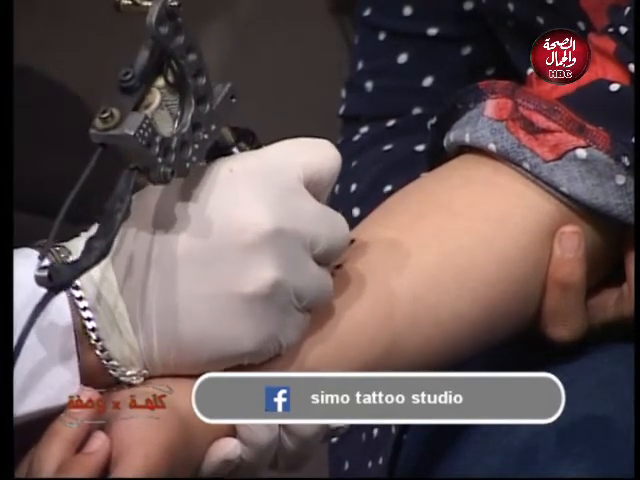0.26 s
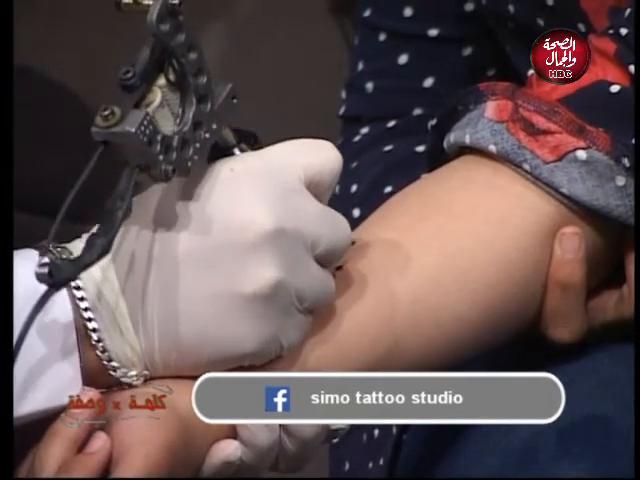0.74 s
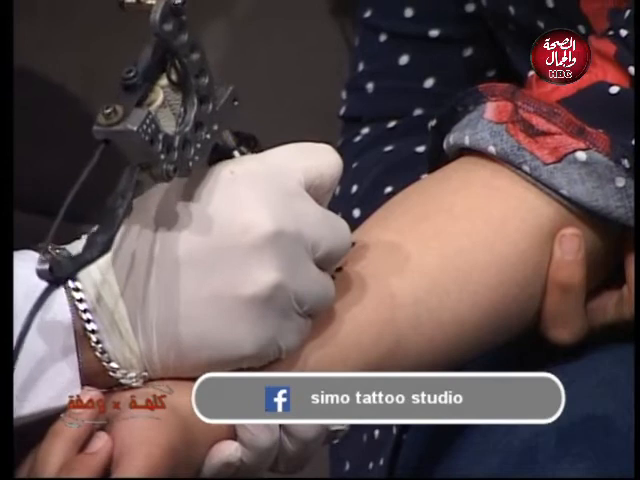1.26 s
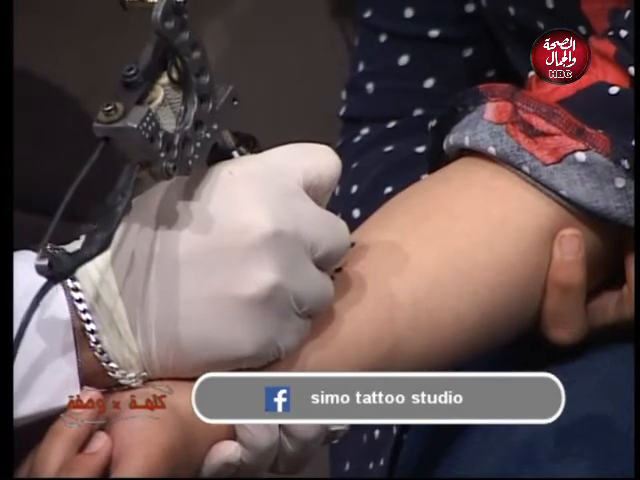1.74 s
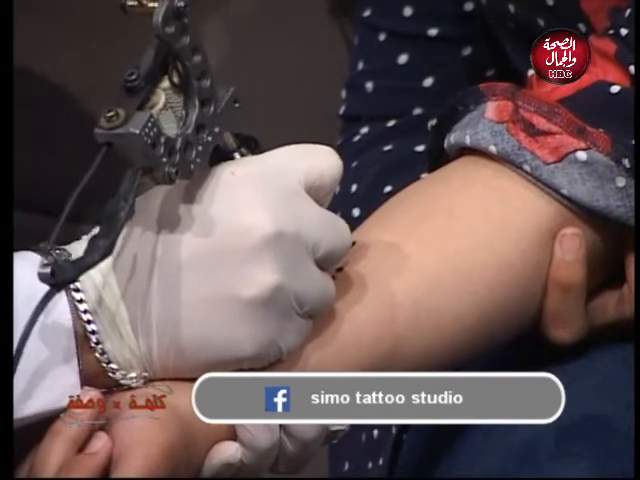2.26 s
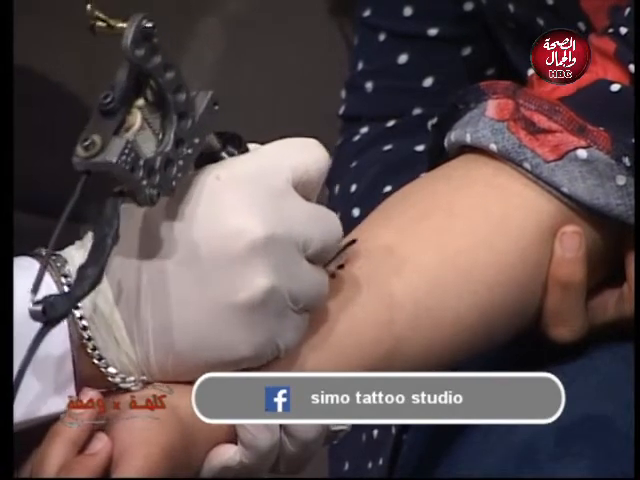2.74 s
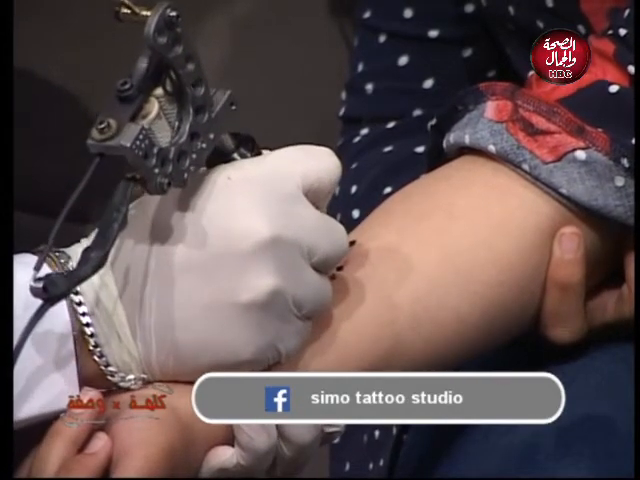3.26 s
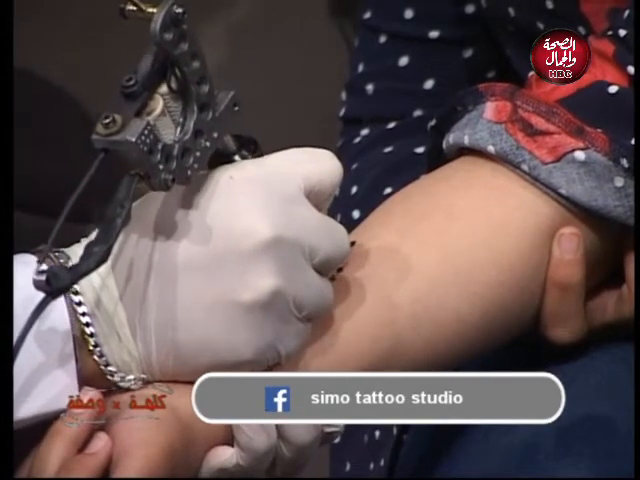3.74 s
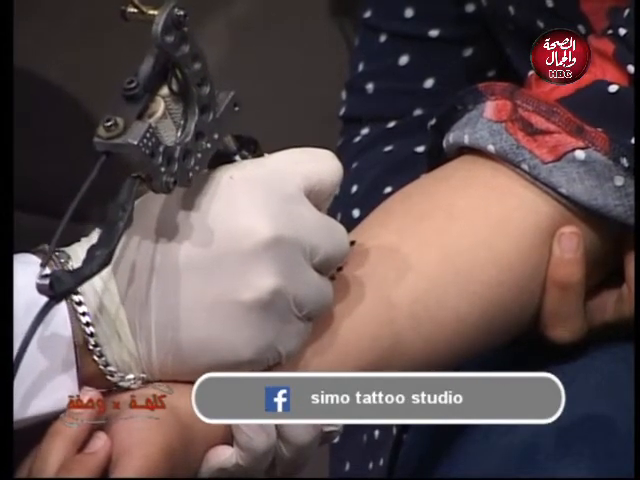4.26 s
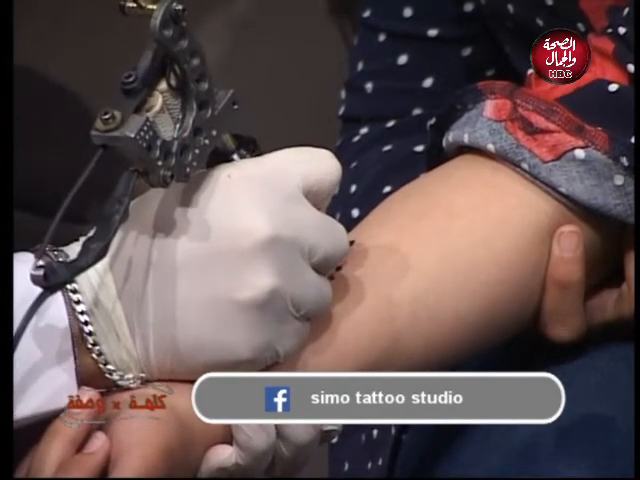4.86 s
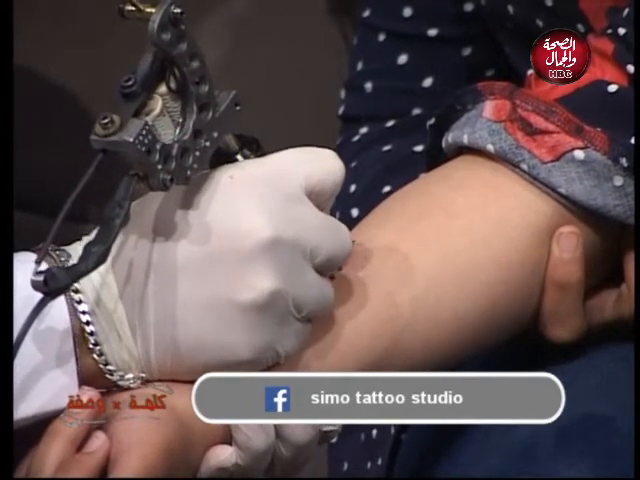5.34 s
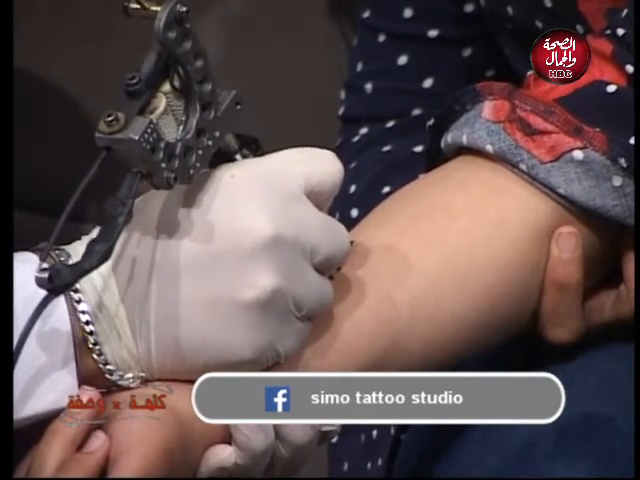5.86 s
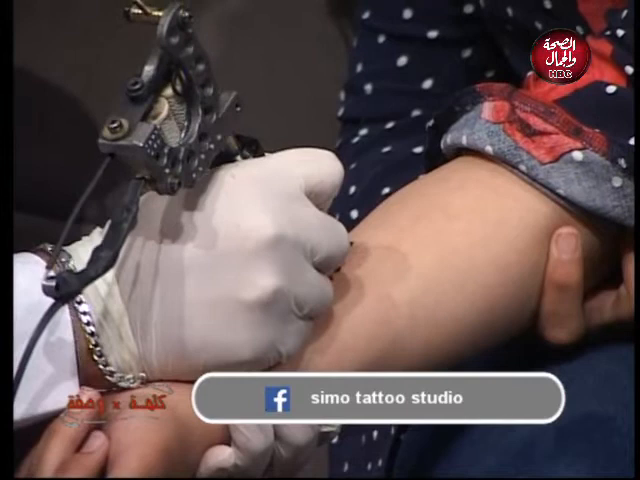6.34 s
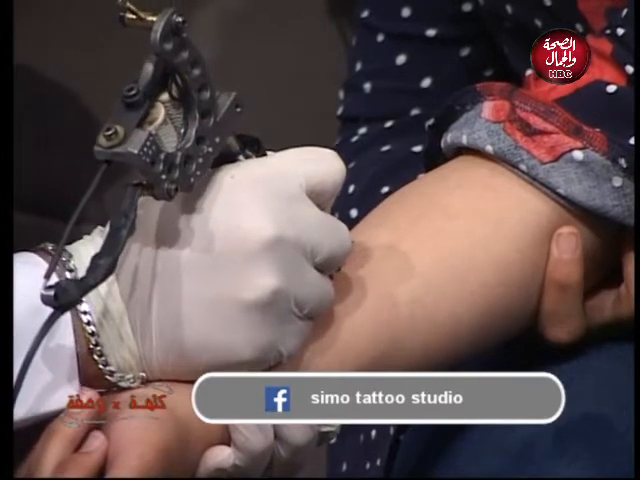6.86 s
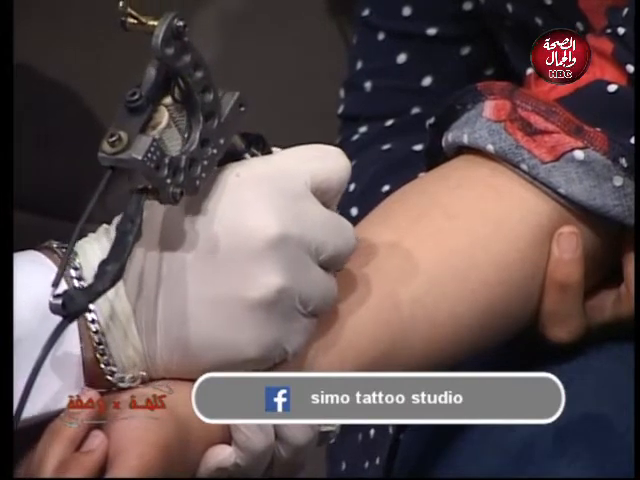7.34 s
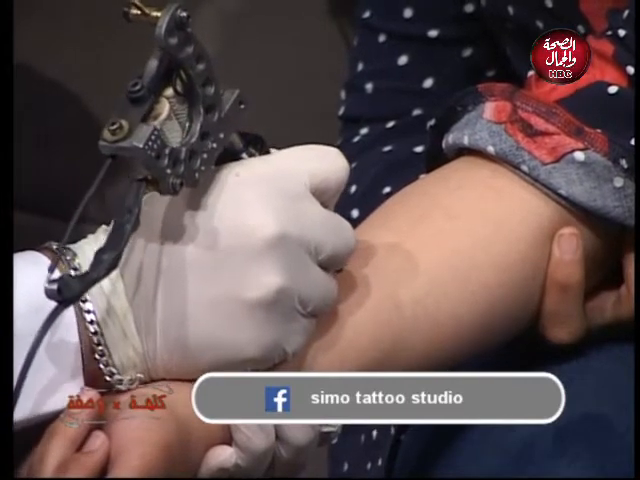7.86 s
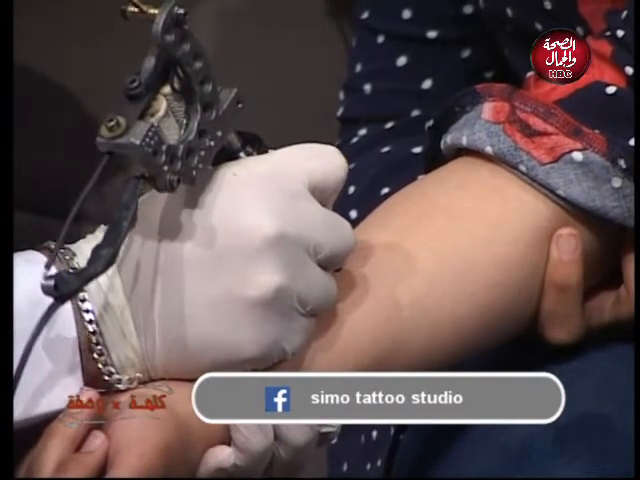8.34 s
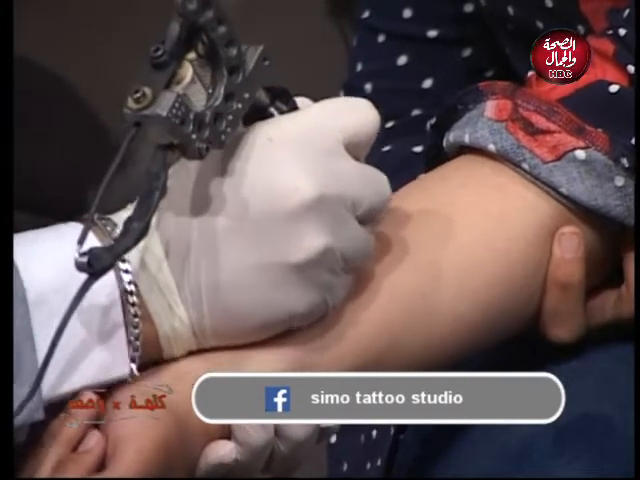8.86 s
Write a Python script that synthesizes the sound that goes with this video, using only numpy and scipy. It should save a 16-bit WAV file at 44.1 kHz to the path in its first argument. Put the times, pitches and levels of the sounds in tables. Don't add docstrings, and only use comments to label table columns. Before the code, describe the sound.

Steady raspy electric buzzing of a tattoo machine with bright steel clatter, broken by two short foot-switch pauses over faint ventilation hum.

```python
import sys
import numpy as np
from scipy import signal
from scipy.fft import rfft, irfft
from scipy.io import wavfile
from scipy.ndimage import uniform_filter1d

SR = 44100
rng = np.random.default_rng(int(sys.argv[2]) if len(sys.argv) > 2 else 0)


def transcribe(u):
    v = np.clip(np.atleast_2d(u).T, -1, 1)
    q = np.round(v * 32767).astype(np.int16)
    wavfile.write(sys.argv[1], SR, q)


def gain_from_db(level_db):
    decades = np.asarray(level_db, float) / 20
    return 10 ** decades


N = 401751


def rms_one(x):
    return x / np.sqrt(np.mean(x ** 2) + 1e-20)


def drift(x, memory):
    return rms_one(signal.lfilter([1], [1, -memory], x, axis=0))


def curve(table, column, s):
    rows = np.array(table)
    return np.interp(s, rows[:, 0], rows[:, column])


def clicks(s, sizes):
    out, taps = np.full(N + 16, 1e-18), np.arange(-4, 6)
    inside = (s >= 0) & (s * SR < N)
    at = np.floor(s[inside] * SR).astype(int)[:, None] + taps
    away = at - s[inside, None] * SR
    np.add.at(out, at + 8, sizes[inside, None] * np.sinc(away) * np.cos(np.pi * away / 11) ** 2)
    return out[8:N + 8]


def ring(x, hz, t60):
    r, w = gain_from_db(-60 / (t60 * SR)), 2 * np.pi * hz / SR
    return signal.lfilter([0, np.sin(w)], [1, -2 * r * np.cos(w), r * r], x)


# first stroke t/s, last stroke t/s, build-up strokes skipped after the first [count]
RUNS = [
    (-0.0013, 2.9551, 9),
    (3.0966, 8.6926, 2),
    (8.8956, 9.1055, 0),
]
# t/s, f/Hz
SPEED = [(0, 120.687), (0.45, 120.698), (0.65, 121.17), (1.2, 120.385), (2.0, 120.119), (2.6, 119.752),
         (2.96, 121.282), (3.1, 121.402), (3.55, 119.717), (3.75, 120.139), (5.0, 120.019), (6.7, 119.533),
         (6.9, 120.538), (8.3, 120.437), (8.45, 119.692), (8.7, 120.277), (8.9, 119.898), (9.11, 119.767)]
START_SLOW, START_S = .11, .007
COAST_S = .01


def strokes():
    times, places, turns, on, t = [], [], np.zeros(N), np.zeros(N), np.arange(N) / SR
    for first, last, skipped in RUNS:
        grid = np.arange(first, last, 1 / SR)
        slow = START_SLOW * np.exp(-((grid - first) / START_S / 2) ** 2) * (first > 0)
        done = np.cumsum(curve(SPEED, 1, grid) * (1 - slow)) / SR
        done *= np.round(done[-1]) / done[-1]
        count = np.arange(int(round(done[-1])) + 1)
        times.append(np.append(np.interp(count, done, grid), last + COAST_S))
        place = count + int(skipped) * ((count > 0) | (first < 0))
        places.append(np.append(place, -1))
        running = (t >= first) & (t < last)
        turns[running], on[running] = np.interp(t[running], grid, done), 1
    return np.concatenate(times), np.concatenate(places), turns, uniform_filter1d(on, size=400)


# tick level/dB, blow level/dB
BUILD_UP = [
    (-8, -35),
    (-3, -9),
    (-1, -1),
]
# t/s, grip [0 loose - 1 firm], skin drumming level/dB, bar rebound level/dB, spring tick level/dB
HAND = [(0, 0.12, -57, -1.5, 14), (.9, 0.19, -73, -10.5, 2), (1.5, 0.029, -93, -2, -0.5),
        (2.3, 0.16, -58, -7, 0.5), (2.9, 0.64, -69, -2, 3.5), (3.15, 0.2, -59, -4, 4),
        (3.9, 0.36, -59, -1, -0.5), (5.0, 0.42, -59, -0.5, 4), (5.5, 0.55, -61, -4.3, 2),
        (6.6, 0.53, -63, -1.5, -2), (7.0, 0.59, -57, -2, 1.5), (7.5, 0.59, -70, -0.5, 2.5),
        (8.0, 0.53, -61, -1, 2.5), (8.4, 0.58, -60, -1.5, 3), (8.7, 0.65, -81, -1, 3.5),
        (9.1, 0.74, -59, -5, -9)]
COAST_TICK_DB = -14
BLOW_LAG_S, LAG_PER_GRIP_S, LAG_WANDER_S = .0013, -.0001, .000012
REBOUND_LAG_S, SETTLE_LAG_S, RETURN_LAG_S = .00036, .0014, .0037


def bar_moves(s, place):
    luck = rng.standard_normal((len(s), 6))
    levels = np.vstack([BUILD_UP, [(0, 0), (COAST_TICK_DB, -60)]])
    tick_db, blow_db = levels[np.minimum(place, 3)].T
    tick_db = tick_db + np.minimum(curve(HAND, 4, s), 1.5)
    rebound_db = blow_db + curve(HAND, 3, s) + .6 * luck[:, 2]
    tick_s = s + .000012 * luck[:, 0]
    lag = BLOW_LAG_S + LAG_PER_GRIP_S * curve(HAND, 1, s) + LAG_WANDER_S * drift(luck[:, 3], .96)
    blow_s = tick_s + lag + .000015 * luck[:, 1]
    rebound_s = blow_s + REBOUND_LAG_S + .00001 * luck[:, 5]
    settle_s = blow_s + SETTLE_LAG_S + .00008 * luck[:, 4]
    return_s = tick_s + RETURN_LAG_S + .0001 * luck[:, 2]
    return (tick_s, blow_s, rebound_s, settle_s, return_s), (tick_db, blow_db, rebound_db), luck


# t60 t/s, level/dB from the bar blow, level/dB gained in a firm grip
FRAME = [(0.0088, -44, -10.5), (0.0038, -11, -10.5), (0.011, -19, 0.5), (0.013, -12, 10), (0.036, -22.5, 6),
         (0.012, -19.5, 7.5), (0.0046, -3, 0.6), (0.00071, -8.5, 7.5), (0.0055, -13.5, -0.5),
         (0.0024, -5.5, -4), (0.0034, 9, -0.1), (0.002, 7.5, -0.3), (0.0035, -3, 0.3), (0.0005, -27, -8)]
FRAME_HZ = [1950, 2830, 3122, 4020, 4457, 5390, 5943, 6800, 7390, 8330, 9737, 10117, 10520, 11200]
POLARITY = [1, 1, -1, 1, -1, 1, 1, 1, -1, 1, 1, -1, -1, 1]
TICK_RE_BLOW = [-4, -15, -14, -6, 3, -5, -5, 2, 2, -2, -4.5, -5, -4.5, -4]
TICK_SIDE = [-1, -1, 1, -1, -1, 1, 1, -1, 1, 1, 1, 1, 1, 1]
REBOUND_DB = [-3, -6, -1]
LONGEST_RING_S = 0.014
TOP_DB, MIDDLE_DB, TUBE_DB = -29, -3, -1.5
TOP_GRIP_DB, MIDDLE_GRIP_DB, TUBE_GRIP_DB = -3, 3, 11
TUBE_PER_BRIGHT_DB = -0.1
SETTLE_DB, RETURN_DB = -12, -15


def frame(s, moments, levels, luck):
    tick_s, blow_s, rebound_s, settle_s, return_s = moments
    tick_db, blow_db, rebound_db = levels
    spread = rng.standard_normal((len(s), len(FRAME), 3))
    wander = drift(spread[:, :, 2], .98)
    grip = curve(HAND, 1, s)
    level_db = TOP_DB + TOP_GRIP_DB * grip
    tube_db = TUBE_DB + TUBE_GRIP_DB * grip + TUBE_PER_BRIGHT_DB * np.maximum(lift(s)[1], 0)
    group_db = [0, MIDDLE_DB + MIDDLE_GRIP_DB * grip, tube_db]
    out = bare_impacts(moments, levels, level_db)
    for k, (hz, (t60, from_blow, grip_db)) in enumerate(zip(FRAME_HZ, FRAME)):
        from_tick = from_blow + TICK_RE_BLOW[k]
        group = int(hz < 9000) + int(hz < 3300)
        base = level_db + group_db[group] + grip_db * grip + .7 * wander[:, k] + .55 * spread[:, k].T
        settle_db = blow_db + SETTLE_DB - 8 * group + 2 * luck[:, 0]
        strikes = TICK_SIDE[k] * clicks(tick_s, gain_from_db(base[0] + from_tick + tick_db + 0.14 * luck[:, 3]))
        strikes += clicks(blow_s, gain_from_db(base[1] + from_blow + blow_db + 0.11 * luck[:, 4]))
        strikes += clicks(rebound_s, gain_from_db(base[1] + from_blow + rebound_db + REBOUND_DB[group]))
        strikes += clicks(settle_s, gain_from_db(base[2] + from_blow + settle_db))
        strikes += clicks(return_s, gain_from_db(base[2] + from_tick + RETURN_DB + 2 * luck[:, 5]))
        out = out + POLARITY[k] * ring(strikes, hz, min(t60, LONGEST_RING_S))
    return out


CLACK_DB, CLACK_HZ, CLACK_T60_S = -20, 4300, 0.002
THUD_DB, THUD_HZ, THUD_T60_S, THUD_LAG_S = -38.5, 1300, .0008, .00057
ROCK_DB, ROCK_HZ, ROCK_T60_S, ROCK_LAG_S = -26, 3550, 0.0036, .00023
RATTLE_DB, RETURN_RATTLE_DB = -11, -1


def bare_impacts(moments, levels, level_db):
    tick_s, blow_s, _, _, return_s = moments
    tick_db, blow_db, rebound_db = levels
    shakes = clicks(tick_s, gain_from_db(level_db + tick_db + RATTLE_DB))
    shakes += clicks(blow_s, gain_from_db(level_db + blow_db + RATTLE_DB))
    shakes += clicks(return_s, gain_from_db(level_db + blow_db + RATTLE_DB + RETURN_RATTLE_DB))
    thud = clicks(blow_s + THUD_LAG_S, gain_from_db(level_db + rebound_db + THUD_DB))
    clack = clicks(blow_s, gain_from_db(level_db + blow_db + CLACK_DB))
    rock = clicks(blow_s + ROCK_LAG_S, gain_from_db(level_db + rebound_db + ROCK_DB))
    out = rattle(shakes) - ring(thud, THUD_HZ, THUD_T60_S) + ring(clack, CLACK_HZ, CLACK_T60_S)
    return out - ring(ring(rock, ROCK_HZ, ROCK_T60_S), ROCK_HZ, ROCK_T60_S)


# low f/Hz, high f/Hz, level/dB
RATTLE_BANDS = [(2600, 12200, -5), (11200, 15300, -2.5)]
RATTLE_T60_S = 0.011


def rattle(strikes):
    puff = signal.lfilter([1], [1, -gain_from_db(-60 / (RATTLE_T60_S * SR))], strikes) * rng.standard_normal(N)
    out = np.zeros(N)
    for low, high, db in RATTLE_BANDS:
        band = signal.butter(2, [low, high], "band", fs=SR, output="sos")
        out += gain_from_db(db) * signal.sosfilt(band, puff)
    return out


PUSH_DB, SLAP_DB = -33, -8.5
UNEVEN_DB, SLAP_UNEVEN = 6.5, 0.55
NEEDLE_DRIFT_DB = 1.8
NUDGE_LAG_S, NUDGE_DB = 0.00008, -14
FLESH_HZ, FLESH_T60_S, FLESH_DB = 312, 0.0029, -6.5
FLESH_WAVER_DB = 3.5
SKIN_LOW_HZ = 148


def needle(s, blow_s, blow_db):
    luck = rng.standard_normal((len(s), 6))
    see_saw = drift(luck[:, 0], -.88)
    flutter = drift(luck[:, 1], .6)
    lift_db, bright_db = lift(s)
    drift_db = NEEDLE_DRIFT_DB * drift(luck[:, 5], .8)
    uneven_db = UNEVEN_DB * np.tanh(1.15 * see_saw + .35 * flutter)
    mean_push = gain_from_db(PUSH_DB + lift_db + drift_db + blow_db)
    push = mean_push * gain_from_db(uneven_db + .7 * luck[:, 2])
    slap = mean_push * gain_from_db(SLAP_DB + bright_db - drift_db + SLAP_UNEVEN * uneven_db + .9 * luck[:, 3])
    squeeze = .7 * clicks(blow_s + .00002, slap) - clicks(blow_s + .00022, slap)
    push_s = blow_s + .0002 + .00014 * luck[:, 4]
    nudge = clicks(s + NUDGE_LAG_S, gain_from_db(NUDGE_DB + luck[:, 5]) * mean_push)
    waver = drift(rng.standard_normal(len(s)), .7)
    flesh = mean_push * gain_from_db(FLESH_DB - drift_db + FLESH_WAVER_DB * waver + .5 * uneven_db)
    knock = ring(squeeze, 1700, 0.00065) - ring(clicks(push_s, push), 730, 0.0019)
    knock += ring(nudge, 1350, 0.0034) - ring(clicks(push_s, flesh), FLESH_HZ, FLESH_T60_S)
    return signal.sosfilt(signal.butter(1, SKIN_LOW_HZ, "high", fs=SR, output="sos"), knock)


# start t/s, length t/s, level/dB, brightening level/dB
LIFTS = [(0, 0.045, -6.5, 10), (0.067, 0.21, 2, 11.5), (0.278, 0.25, -2, 13), (0.501, 0.26, 5, 12),
         (0.84, 0.21, 3, 10.5), (1.13, 0.17, 3, 2), (1.475, 0.065, 7, 2), (1.686, 0.44, 3, -13),
         (2.699, 0.26, 5.5, 11.5), (3.053, 0.13, 3, 13.5), (3.235, 0.35, 2.5, 4), (3.788, 0.49, 0.5, -2.5),
         (4.287, 0.56, 2.5, 4), (5.054, 0.12, 1.5, -2), (5.464, 0.13, 3, -7), (5.87, 0.11, 2, -9),
         (6.28, 0.32, 2, -8), (6.75, 0.25, 3.5, 1.5), (7.13, 0.28, 5, 0), (7.417, 0.12, 4, 9.5),
         (7.542, 0.47, 5.5, 2.5), (8.046, 0.34, 4, 2), (8.49, 0.11, 6.5, -6), (8.563, .14, 5.5, 15),
         (8.872, 0.096, 2.5, 14.5), (9, 0.098, 5, 8)]
LIFT_RAMP_S = .08


def lift(s):
    out = np.zeros((2, len(s)))
    for start, length, db, bright_db in LIFTS:
        shape = np.clip(.5 + np.minimum(s - start, start + length - s) / LIFT_RAMP_S, 0, 1)
        out += np.outer([db, bright_db], shape)
    return out


HOLLOW_HZ, HOLLOW_WIDTH_HZ = 3666, 430
HOLLOW_SHARE, HOLLOW_PER_GRIP = 1, 0.65


def cupped_hand(x):
    r, w = np.exp(-np.pi * HOLLOW_WIDTH_HZ / SR), 2 * np.pi * HOLLOW_HZ / SR
    band = signal.lfilter([(1 - r * r) / 2, 0, (r * r - 1) / 2], [1, -2 * r * np.cos(w), r * r], x)
    grip = curve(HAND, 1, np.arange(N) / SR)
    return x - np.clip(HOLLOW_SHARE - HOLLOW_PER_GRIP * grip, 0, 1) * band


SWING_PER_BRIGHT_DB = -0.36


def bar_swing(turns, on):
    t = np.arange(N) / SR
    level = np.sqrt(2) * gain_from_db(curve(HAND, 2, t) + SWING_PER_BRIGHT_DB * lift(t)[1]) * on
    return level * (np.cos(2 * np.pi * (turns + 0.32)) + .5 * np.cos(4 * np.pi * (turns + 0.18)))


# t/s, snap level/dB, blade tone level/dB, case knock level/dB
SWITCH = [
    (2.9578, -11, -27, -43),
    (3.048, -62, -70, -53),
    (3.067, -47, -70, -51),
    (3.0822, -21, -46, -50),
    (3.0878, -26, -58, -51),
    (8.6967, -12.5, -26, -52),
    (8.817, -72, -94, -55),
    (8.8819, -21, -38, -53),
    (8.890, -62, -65, -68),
]
# f/Hz, level/dB, t60 t/s
SNAP = [(3100, -18, .006), (4650, -15, .006), (6900, -2, .009), (7800, -6, .006), (9800, -10, .005),
        (12500, -14, .004), (14500, -19, .004)]
KNOCK_HZ, KNOCK_T60_S = 990, .032
BLADE_HZ, BLADE_T60_S = 4330, .009


def foot_switch():
    s, snap_db, blade_db, knock_db = np.transpose(SWITCH)
    bounces = rng.standard_normal((len(SNAP), 130)) * gain_from_db(-np.arange(130) / 5.0)
    snaps = clicks(s, gain_from_db(snap_db - 26.0))
    out = ring(clicks(s + 0.00146, gain_from_db(knock_db)), KNOCK_HZ, KNOCK_T60_S)
    out += ring(clicks(s + 0.00061, gain_from_db(blade_db)), BLADE_HZ, BLADE_T60_S)
    for burst, (hz, level_db, t60) in zip(bounces, SNAP):
        out += gain_from_db(level_db) * ring(signal.lfilter(burst, [1], snaps), hz, t60)
    return out


STUDIO_T60_S, STUDIO_DB = .42, -13.5
NEAR_T60_S, NEAR_DB = 0.0043, -33.5
WALL_CUT_HZ = 4800


def studio(x):
    t = np.arange(SR // 2) / SR
    white = rng.standard_normal(len(t))
    dull = signal.sosfilt(signal.butter(1, WALL_CUT_HZ, fs=SR, output="sos"), white)
    decay = gain_from_db(STUDIO_DB) * (gain_from_db(-60 * t / STUDIO_T60_S) + gain_from_db(NEAR_DB - 60 * t / NEAR_T60_S))
    tail = (dull + (white - dull) * gain_from_db(-100 * t)) * decay * (t > .0008) / np.sqrt(SR * 0.02)
    tail = signal.sosfilt(signal.butter(2, 900, "high", fs=SR, output="sos"), tail)
    return signal.fftconvolve(x, tail)[:N]


# f/Hz, level/dB per Hz
AIR = [(18, -39), (45, -3), (62, -4), (90, -40), (300, -17), (1000, -36), (8000, -34), (16000, -50)]
# f/Hz, level/dB rms, t60 t/s
DUCT = (150, -64, 0.03)
AIR_DB = -66


def studio_air():
    hz = np.fft.rfftfreq(N, 1 / SR) + 1
    points = np.array(AIR)
    colour = gain_from_db(np.interp(np.log(hz), np.log(points[:, 0]), points[:, 1]))
    hiss = gain_from_db(AIR_DB) * rms_one(irfft(rfft(rng.standard_normal(N)) * colour, N))
    duct_hz, duct_db, t60 = DUCT
    return hiss + gain_from_db(duct_db) * rms_one(ring(rng.standard_normal(N), duct_hz, t60))


def scene():
    s, place, turns, on = strokes()
    moments, levels, luck = bar_moves(s, place)
    steel = frame(s, moments, levels, luck)
    skin = needle(s, moments[1], levels[1])
    near = cupped_hand(steel + skin) + foot_switch()
    return (near + studio(near) + bar_swing(turns, on) + studio_air())[None]


def band_limit(x):
    return signal.sosfilt(signal.butter(12, 16690, fs=SR, output="sos"), x)


def record(dry):
    bass = signal.butter(2, 45, "high", fs=SR, output="sos")
    top = signal.ellip(12, .5, 52, 15850, fs=SR, output="sos")
    mix = signal.sosfilt(np.vstack([bass, top]), dry)
    return band_limit(mix)


dry = scene()
out = record(dry)
transcribe(out)
```